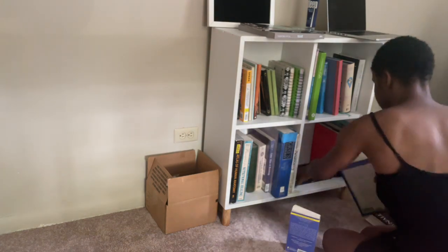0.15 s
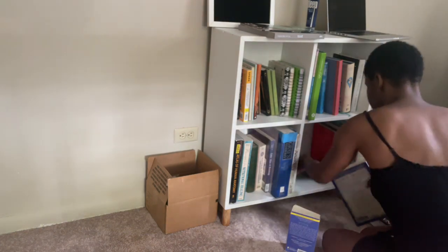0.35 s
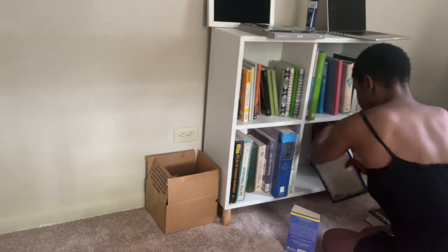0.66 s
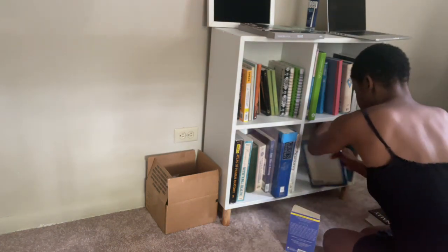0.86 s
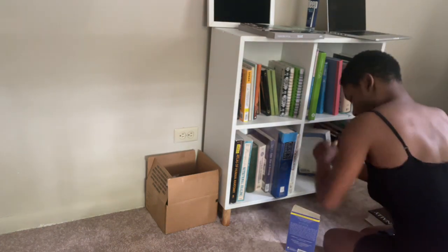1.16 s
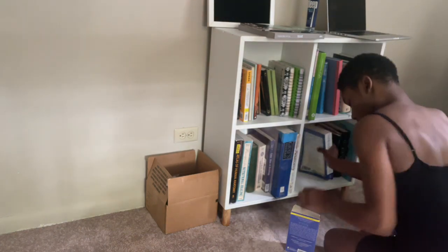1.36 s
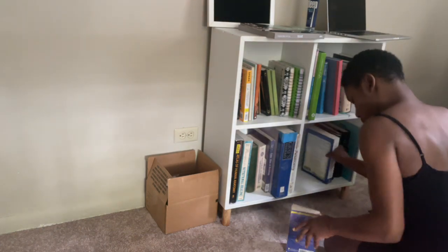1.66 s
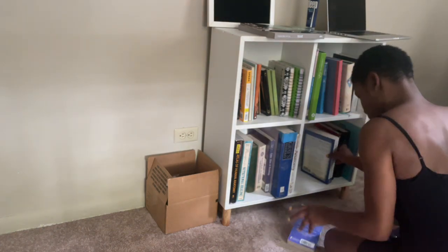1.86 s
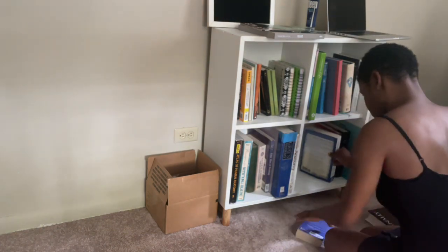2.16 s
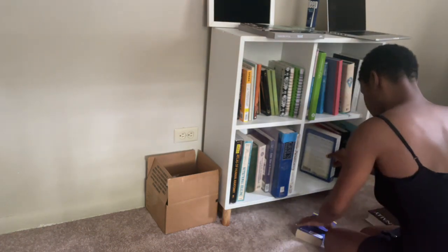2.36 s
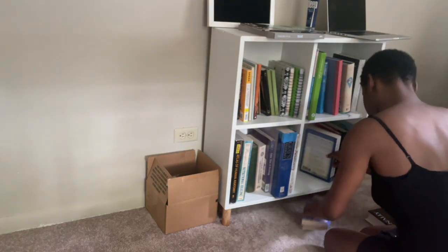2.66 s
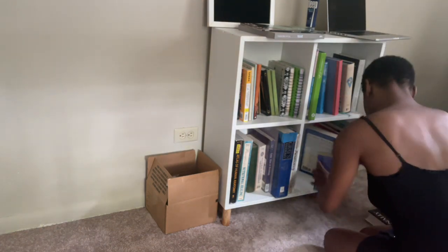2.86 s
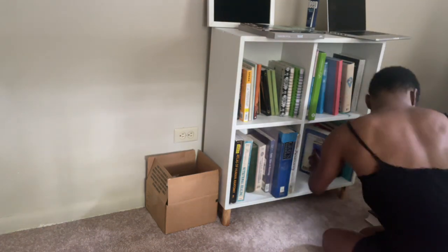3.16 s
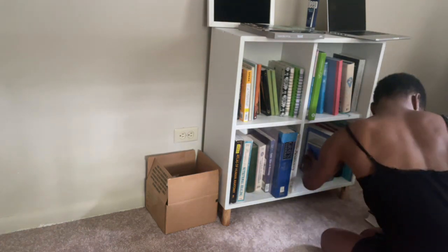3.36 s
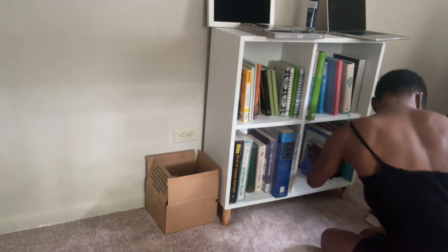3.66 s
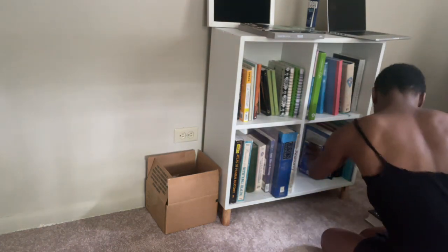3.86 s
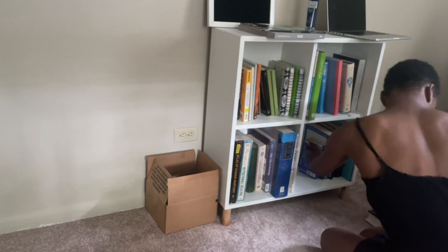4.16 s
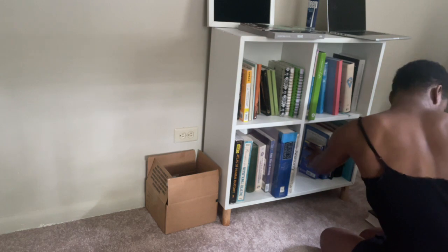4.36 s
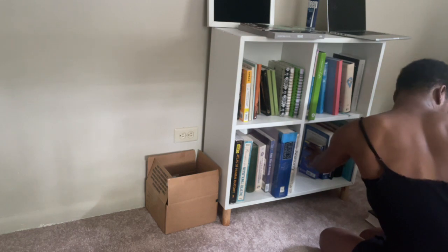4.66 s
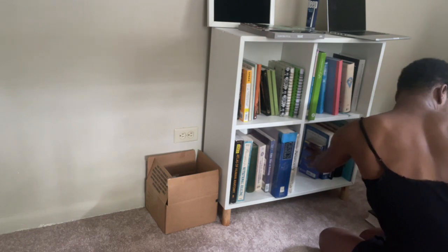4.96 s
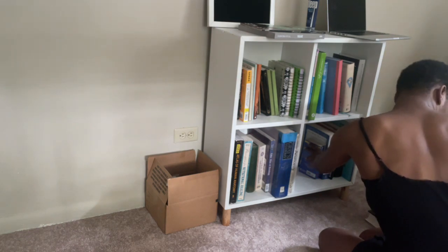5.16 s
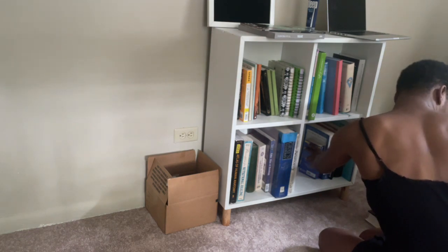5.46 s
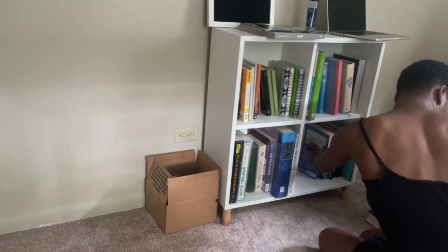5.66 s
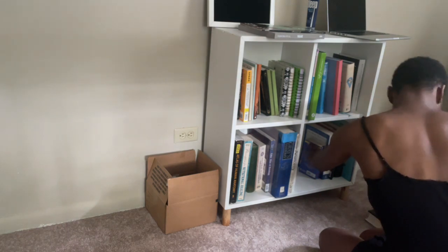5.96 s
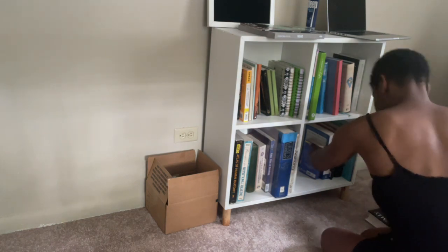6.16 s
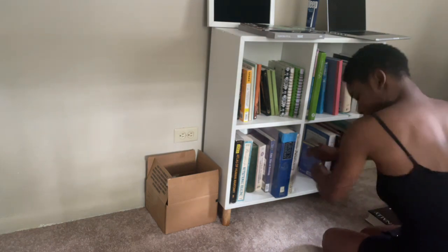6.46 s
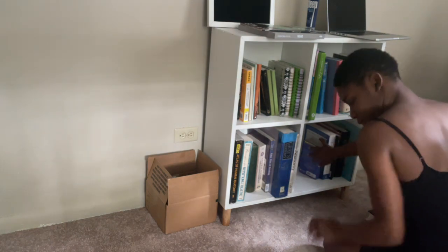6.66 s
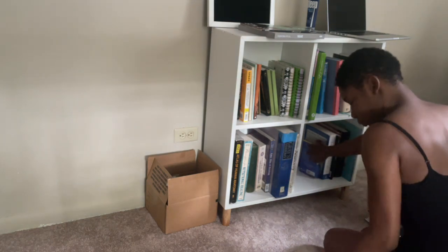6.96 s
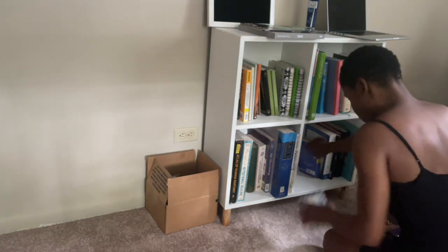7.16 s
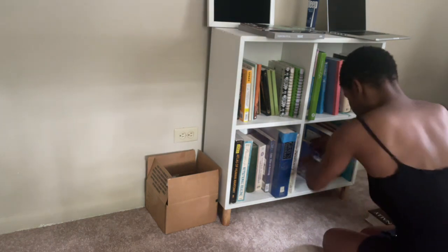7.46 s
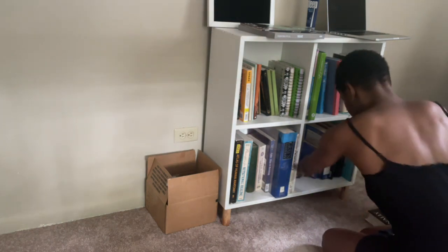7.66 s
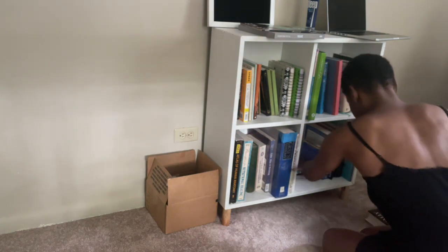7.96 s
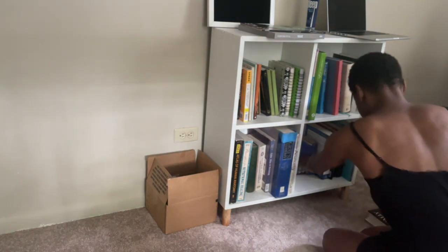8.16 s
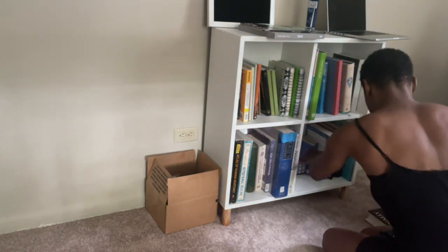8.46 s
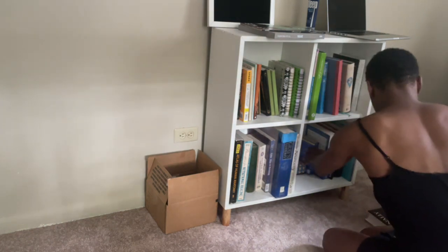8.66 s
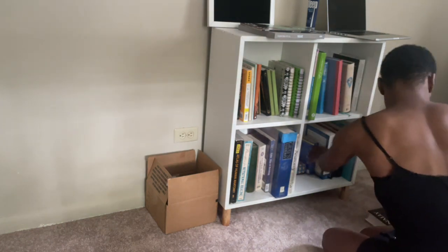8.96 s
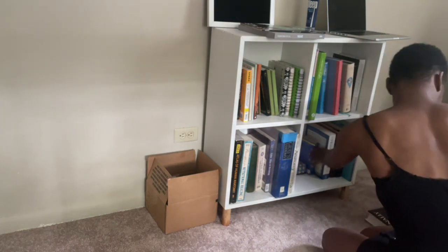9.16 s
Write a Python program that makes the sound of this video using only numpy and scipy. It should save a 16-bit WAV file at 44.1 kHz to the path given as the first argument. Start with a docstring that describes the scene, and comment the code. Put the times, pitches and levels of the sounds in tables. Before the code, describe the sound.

Irregular soft knocks, papery slides and a small frame click at a bookshelf over faint low hum, then a book topples with a sharp slap.

```python
"""At first a faint two-note hum holds steady; at 0.7 s it shifts in level, then slowly fades into quiet room air.
From the start a picture frame and books go into a cube bookshelf in a small carpeted room: noise bursts and
ringing modes make edges tap and thud, grainy filtered noise makes covers scuff, and the frame clicks near 1.7 s.
At 7.5 s one book topples with a loud slap, and a few last taps and scuffs follow.
Clothes shift faintly on the carpet throughout, as soft grainy noise."""
import sys
import numpy as np
from scipy import signal
from scipy.fft import rfft, irfft, next_fast_len
from scipy.io import wavfile
from scipy.ndimage import map_coordinates

SR = 44100
rng = np.random.default_rng(int(sys.argv[2]) if len(sys.argv) > 2 else 0)


def output_pcm(signal):
    """Save a mono or channel-first signal as 16-bit PCM at the path in sys.argv[1].

    Samples are clipped to [-1, 1] before scaling.
    """
    pcm = np.clip(np.atleast_2d(signal).T, -1, 1) * 32767
    wavfile.write(sys.argv[1], SR, np.round(pcm).astype(np.int16))


N = 411012  # length in samples

# Books meeting the shelf and each other; long contacts are dull, heavy ones rich in bass. Each row: start in
# seconds, base level in dB, weight in dB per octave of bass (exact in the deepest register), contact time in ms.
BOOK_CONTACTS = [(0.065, -57.5, -3, 0.067), (0.083, -57.5, -5, 0.046), (0.331, -55.5, -2, 0.75),
                 (0.361, -42.5, -7.5, 0.94), (0.731, -72.5, 5.5, 0.068), (0.861, -68.5, 4.5, 1.8),
                 (0.923, -44.5, -4, 1.75), (0.976, -64.5, 5.5, 0.72), (1.066, -72, 6.5, 0.34),
                 (1.267, -59.5, 3, 3.5), (1.622, -45, 0, 2.16), (1.659, -47, 1, 0.46),
                 (1.698, -65.5, 4.5, 0.093), (1.93, -58, 5.5, .8), (1.943, -66.5, 6.5, 1),
                 (3.457, -66.5, 6.5, 1.3), (3.485, -38, 0, 1.67), (3.499, -49, 3.5, .9),
                 (3.534, -56.5, -8, 0.15), (3.648, -62.5, 4, 0.66), (3.694, -57, 1.5, 1.84),
                 (3.721, -64, 4, 0.38), (4.411, -58, -6.5, 1.05), (4.477, -52.5, -13.5, 0.31),
                 (4.71, -66, -0.5, 0.74), (4.82, -65, -3.5, 2.1), (4.934, -50, -8, 1.27),
                 (4.946, -44.5, -13, 1.28), (5.034, -50, -6, 1.5), (6.262, -64.5, 1.5, 2.6),
                 (6.375, -72, 1, 2.1), (6.522, -74, -9, 1.3), (6.914, -61, -6, 0.73),
                 (7.492, -58, 0.5, 0.58), (7.508, -45, -10, 0.2), (7.533, -40.5, -21, 0.17),
                 (7.536, -22.5, -5, 0.14), (7.541, -20.5, -6.5, 3.8), (7.996, -58.5, -2, 0.33),
                 (8.008, -55.5, 2.5, 1.6), (8.044, -56, 1.5, 0.82), (8.124, -35.5, -1, 0.93),
                 (8.44, -75.5, -8.5, .8), (8.506, -73.5, 6, 0.51), (8.775, -71, -0.5, 1.6),
                 (8.925, -51, -0.5, 1.74), (8.987, -44, -2, 2.1)]
# Edges of a contact's registers (thump, board, knock, rap, clack, tick). Each entry: frequency in Hz.
REGISTER_EDGES_HZ = [70, 200, 420, 780, 1750, 5200, 15800]
# How readily the boards answer in each register. Each entry: relative level in dB.
BOARD_RESPONSE_DB = [1, 3.5, 0, -2, -4.5, -5.5]
# Ringing modes of the shelf. Each row: frequency in Hz, relative level in dB, t60 in seconds.
SHELF_MODES = [(139.9, -3.5, 0.31), (254.1, -5.5, 0.18), (326, -3.5, 0.23), (398.3, -9.5, .33),
               (508.3, -6.5, 0.086), (606.3, -4, 0.15), (698, -4.5, 0.097), (856, -4.5, 0.083),
               (984, -5.5, .18), (1075, -5.5, 0.24), (1175, -7, .25), (1448, -2.5, 0.34), (1544, -1, 0.1),
               (1970, -13, .22), (2450, -9, 0.23), (2688, -7, .16), (2860, -4.5, .2), (3010, -6.5, .2),
               (3580, -8, 0.4), (4780, -5.5, 0.15)]
# Colour of a contact. Each row: frequency in Hz, relative level in dB.
CONTACT_COLOUR = [(60, -8), (140, 1.5), (330, 5.5), (500, 5), (900, -2), (1500, -6.5), (2100, -7.5),
                  (2900, -7.5), (4600, -14.5), (5500, -18), (9500, -21), (12500, -34.5), (15500, -41)]
# Decay of the room. Each row: frequency in Hz, t60 in seconds.
ROOM_DECAY = [(100, 0.4), (350, 0.46), (1500, 0.47), (5000, .43), (9000, 0.46), (15000, 0.37)]

# Strokes of a sliding book; grip favours the rubbing edge over the paper. Each row: start in seconds,
# length in seconds, base level in dB, grip in dB, push (growth from start to end) in dB.
SLIDE_STROKES = [(0.064, 0.086, -64, 1, -6), (0.196, 0.16, -68, 7, 6), (0.31, 0.17, -67.5, -4, -9),
                 (0.502, 0.062, -66.5, -3, -2), (0.721, 0.13, -76, 1, -8), (0.856, .17, -71, -8, 5),
                 (1.056, .1, -70, -2.5, -4), (1.252, .18, -64, 1.5, 0), (1.514, 0.12, -67, -2, 19.5),
                 (1.663, 0.044, -57, -10, 2.5), (1.9, 0.3, -71, 4, 5), (3.154, 0.48, -73.5, 0.5, -8.5),
                 (3.313, 0.198, -58.5, -5.5, 9.5), (3.666, 0.094, -64.5, -1, 3),
                 (4.149, 0.66, -71.5, 2.5, 5), (4.51, 0.056, -61, 4, -1), (4.569, 0.19, -74, 8.5, 1),
                 (4.76, 0.34, -80.5, -5, 2), (4.918, 0.1, -76, 18.5, -1), (5.023, 0.087, -67.5, 2, -9),
                 (5.09, 0.21, -83.5, 6, -8), (5.817, .075, -76, 5.5, 2), (5.987, 0.057, -78, 5.5, -9),
                 (6.613, 0.092, -79, 1.5, -1), (6.775, .05, -83, 4, -3), (6.845, .15, -73.5, -4.5, -3.5),
                 (7.322, 0.2, -81.5, -7, 31), (7.986, 0.18, -63.5, -1.5, -6), (8.305, .14, -88.5, -20, 4),
                 (8.495, .06, -71.5, -6.5, 2), (8.935, .08, -61.5, -4.5, -4.5),
                 (9.145, 0.053, -84.5, 6, -1)]
# Colour of edges rubbing on the board. Each row: frequency in Hz, relative level in dB.
RUB_COLOUR = [(40, -46), (120, -19.5), (300, 7.5), (550, -7), (1000, -4.5), (1400, -3.5), (2000, -5),
              (3200, -29), (6000, -59)]
# Colour of cover on cover. Each row: frequency in Hz, relative level in dB.
SCUFF_COLOUR = [(500, -53), (1200, -29), (2300, 1), (3000, -1), (4100, 0), (5400, -2.5), (6300, -5),
                (8500, -26), (13000, -56.5)]
# Colour of hissing paper. Each row: frequency in Hz, relative level in dB.
PAPER_COLOUR = [(2000, -51), (4000, -28.5), (6300, -3.5), (7500, -1), (9300, -1), (11500, -5.5),
                (13000, -15), (15500, -26)]
# Sheen of a fast stroke. Each row: frequency in Hz, relative level in dB.
SWISH_COLOUR = [(2500, -34.5), (4000, -7.5), (5300, -0.5), (6300, -2.5), (8000, -18.5), (12000, -44.5)]

# Hard little contacts of a picture frame, fingernails and cover corners. Each row: start in seconds,
# frame ring level in dB, snap level in dB.
HARD_CLICKS = [(0.368, -73, -61.5), (1.66, -43.5, -65), (1.93, -72.5, -76.5), (1.944, -75, -70.5),
               (1.973, -74, -69), (2.249, -59, -67), (2.254, -76, -64.5), (2.778, -99, -82),
               (2.899, -100, -93), (5.933, -86, -83), (6.615, -89, -74.5), (6.636, -85, -72.5),
               (8.504, -89, -84)]
# Ringing of the frame, damped by the hand that holds it. Each row: frequency in Hz, relative level in dB,
# t60 in seconds.
FRAME_MODES = [(1240, -8, 0.021), (1740, -3, 0.018), (1960, 1.5, 0.023), (2110, 3.5, 0.034),
               (2270, 2.5, 0.024), (2560, -2, 0.02), (2970, 1.5, 0.011), (3520, -8, 0.018),
               (4200, 3, 0.0082), (5360, -7.5, 0.0113)]
# Colour of a snap. Each row: frequency in Hz, relative level in dB.
SNAP_COLOUR = [(500, -12), (1300, -11), (2300, 0), (4500, 3.5), (7000, -3), (10000, -4), (12500, -21),
               (15500, -21)]

# Colour of cloth on carpet. Each row: frequency in Hz, relative level in dB.
CARPET_COLOUR = [(30, -41.5), (100, -12), (220, 2.5), (400, -2.5), (800, -10.5), (1500, -21), (4000, -35.5),
                 (12000, -57.5)]
# Colour of the room's still air. Each row: frequency in Hz, relative level in dB.
AIR_COLOUR = [(20, -43), (31, -32.5), (40, -23), (60, 2.5), (100, 0), (145, 0.5), (210, -8), (320, -22),
              (500, -23.5), (1000, -28.5), (2000, -36), (4000, -40), (10000, -43), (13000, -52),
              (15500, -61.5)]

BASS_BELOW_HZ, BASS_BEND = 620, 1.4  # weight tells below this pitch, and most in the deepest register
CONTACT_Q = 0.91  # the cover springs on the board, favouring the pitch near 1 / contact time
CORNER_DB = -38.5  # a hard corner always adds a trace of treble
SLIDE_ATTACK_S, SLIDE_RELEASE_S = 0.025, 0.01  # a book gets moving, and comes to rest
SLIDE_ARCH_DB = 2  # a stroke is fastest in its middle
HISS_DB, HISS_LOSS = -4.5, 0.35  # paper against the scuff; dB of it lost per dB of grip
SWISH_EVEN_DB = -54  # scuff level at which the faster-growing swish equals it
LOAD_CHANGE_S, LOAD_GLIDE_S = 0.72, 0.23  # when the machinery changes its load, and how long the step takes


def knocks():
    """Every contact sounds anew; weight and contact time set its registers."""
    out = np.zeros(N + SR)
    for start, level_db, weight_db, contact_ms in BOOK_CONTACTS:
        hit = blow(register_levels(level_db, weight_db, contact_ms))
        out[round(start * SR):][:len(hit)] += hit
    return out[:N]


def register_levels(level_db, weight_db, contact_ms):
    """Weight tilts the bass; a contact cannot excite much above the inverse of its duration."""
    edges = np.array(REGISTER_EDGES_HZ)
    centre_hz = np.sqrt(edges[:-1] * edges[1:])
    cycles = centre_hz * contact_ms / 1000
    spring = 1 / np.hypot(1 - cycles ** 2, cycles / CONTACT_Q)
    treble_db = 20 * np.log10(np.hypot(spring, amp(CORNER_DB)))
    octaves = np.maximum(np.log2(BASS_BELOW_HZ / centre_hz), 0)
    bass = octaves[0] * (octaves / octaves[0]) ** BASS_BEND
    return level_db + np.array(BOARD_RESPONSE_DB) + weight_db * bass + treble_db


def blow(levels_db, crack_db=8, crack_t60=0.025, rattle_t60=0.21, room_db=-8, ring_db=-17,
         swell_cycles=0.34, shortest_swell_s=0.00059):
    """One contact: a crack, a short rattle of covers, the ringing shelf and the room, levelled by register."""
    t = np.arange(SR // 2) / SR
    crack, rattle = rng.standard_normal((2, len(t)))
    ring = np.zeros(len(t))
    for hz, db, t60 in SHELF_MODES:
        vary_db, phase = rng.standard_normal(2)  # no two contacts ring quite alike
        ring += amp(db + vary_db) * fade(t, t60) * np.sin(2 * np.pi * (hz * t + phase))
    hit = amp(crack_db) * fade(t, crack_t60) * crack
    hit += fade(t, rattle_t60) * rattle
    hit += amp(room_db) * room_tail()
    hit += amp(ring_db) * ring
    hit = coloured(hit, CONTACT_COLOUR)

    out = np.zeros(len(t))
    for db, lo, hi in zip(levels_db, REGISTER_EDGES_HZ, REGISTER_EDGES_HZ[1:]):
        # card gives a little on contact, and the boards need part of a cycle to swing up
        swell_s = max(shortest_swell_s, swell_cycles / np.sqrt(lo * hi))
        part = register(hit * (1 - np.exp(-t / swell_s)), lo, hi)
        out += amp(db) * part / np.std(part[:SR // 20])  # levelled on its first 50 ms
    return out


def register(x, lo, hi):
    """The part of x between two frequencies; the upper edge is steep, as soft card gives no treble."""
    above = signal.butter(3, lo, "high", fs=SR, output="sos")
    below = signal.butter(6, hi, fs=SR, output="sos")
    return signal.sosfilt(np.vstack([above, below]), x)


def slides(room_db=-1.5, uneven_db=1.5, sway_db=-0.57):
    """One stroke drives every friction: edges rub, covers scuff, paper hisses, and fast strokes swish."""
    power = np.zeros((3, N))
    for start, length, level_db, grip_db, push_db in SLIDE_STROKES:
        gains = amp(level_db + np.array([grip_db, 0, HISS_DB - HISS_LOSS * grip_db]))
        power += (gains[:, None] * stroke(start, length, push_db)) ** 2
    rub, scuff, hiss = np.sqrt(power)
    swish = scuff ** 2 / amp(SWISH_EVEN_DB)
    pressure = amp(uneven_db * wobble(70) + sway_db * wobble(16))
    dry = rub * friction(RUB_COLOUR, slips_hz=198, grain_db=-1.5)
    dry += scuff * friction(SCUFF_COLOUR, slips_hz=296, grain_db=-4)
    dry += hiss * friction(PAPER_COLOUR, slips_hz=302, grain_db=-4.5)
    dry += swish * friction(SWISH_COLOUR, slips_hz=300, grain_db=-8)
    return in_room(pressure * dry, room_db)


def stroke(start, length, push_db):
    """Gain of one stroke: it sets in, swells, grows or slackens, and stops."""
    t = np.arange(N) / SR - start
    attack = np.clip(t / SLIDE_ATTACK_S, 0, 1)
    release = np.clip(1 - (t - length) / SLIDE_RELEASE_S, 0, 1)
    done = np.clip(t / length, 0, 1)
    arch_db = SLIDE_ARCH_DB * (np.sin(np.pi * done) - 1)
    return attack * release * amp(push_db * (done - 0.5) + arch_db)


def friction(spectrum, slips_hz, grain_db):
    """Fibres catching and letting go: tiny random slips over a smooth hiss."""
    slips = (rng.random(N) < slips_hz / SR) * rng.standard_normal(N)
    return unit(coloured(rng.standard_normal(N) + amp(grain_db) * unit(slips), spectrum))


def clicks(snap_t60=0.015, room_db=-2):
    """A brief snap and the frame's short, dry ring, carried on by the room."""
    t = np.arange(SR // 2) / SR
    out = np.zeros(N + SR)
    for start, ring_db, snap_db in HARD_CLICKS:
        ring = np.zeros(len(t))
        for hz, db, t60 in FRAME_MODES:
            ring += amp(db) * fade(t, t60) * np.sin(2 * np.pi * (hz * t + rng.random()))
        snap = coloured(rng.standard_normal(len(t)) * fade(t, snap_t60), SNAP_COLOUR)
        hit = amp(ring_db) * ring / np.std(ring[:SR // 20])
        hit += amp(snap_db) * snap / np.std(snap[:SR // 20])
        out[round(start * SR):][:len(t)] += in_room(hit, room_db)
    return out[:N]


def shuffling(level_db=-78, uneven_db=0.5):
    """Knees and clothes shift faintly on the carpet all along: soft friction with a wavering level."""
    return amp(level_db + uneven_db * wobble(11)) * friction(CARPET_COLOUR, slips_hz=59, grain_db=-3.5)


def background(air_db=-66):
    """Two wavering hums of distant machinery over the room's still air."""
    upper_gain = hum_gain(level_db=-54, step_db=-5.5, fade_db_per_s=2.2)
    lower_gain = hum_gain(level_db=-68, step_db=7, fade_db_per_s=1.8)
    hum = upper_gain * tone(111.5, drift_hz=1.1, waver_db=2.0)
    hum += lower_gain * tone(72, drift_hz=2.1, waver_db=1.3)
    return hum + amp(air_db) * unit(coloured(rng.standard_normal(N), AIR_COLOUR))


def hum_gain(level_db, step_db, fade_db_per_s):
    """Steady until the machinery's change of load, then a step and a slow fade."""
    since = np.maximum(np.arange(N) / SR - LOAD_CHANGE_S, 0)
    return amp(level_db + step_db * np.minimum(since / LOAD_GLIDE_S, 1) - fade_db_per_s * since)


def tone(hz, drift_hz, waver_db):
    """A slightly unsteady sine of rms 1: its pitch drifts and its level wavers."""
    phase = 2 * np.pi * np.cumsum(hz + drift_hz * wobble(5.2)) / SR
    return unit(np.sin(phase) * amp(waver_db * wobble(7.6)))


def in_room(x, room_db, early_db=10, early_t60=0.1):
    """Shares power between the direct path and reflections, most of them early, from the cubby's walls."""
    tail = room_tail()
    t = np.arange(len(tail)) / SR
    tail = tail * (1 + amp(early_db) * fade(t, early_t60))
    wet = signal.fftconvolve(x, tail / np.linalg.norm(tail))[:len(x)]
    return (x + amp(room_db) * wet) / np.hypot(1, amp(room_db))


def room_tail():
    """Half a second of dense reflections as noise; each frequency dies at its own speed."""
    hz, t, z = signal.stft(rng.standard_normal(SR), SR, nperseg=256)
    decay = amp(-60 * t / along(ROOM_DECAY, hz)[:, None])
    return signal.istft(z * decay, SR, nperseg=256)[1][:SR // 2]


def coloured(x, spectrum):
    """x through a causal minimum-phase filter with the given (Hz, dB) shape."""
    size = 2 * next_fast_len(len(x))
    cepstrum = irfft(np.log(amp(along(spectrum, np.fft.rfftfreq(size, 1 / SR)))))
    # folding the cepstrum forward puts the filter's energy right at the onset
    cepstrum[1:size // 2] *= 2
    cepstrum[size // 2 + 1:] = 0
    return irfft(rfft(x, size) * np.exp(rfft(cepstrum)))[:len(x)]


def along(points, hz):
    """(Hz, value) points read on a log frequency axis."""
    f, v = np.transpose(points)
    return np.interp(np.log(hz + 1), np.log(f + 1), v)


def wobble(rate):
    """A smooth random curve, rate knots a second."""
    knots = rng.standard_normal(int(N * rate / SR) + 4)
    return map_coordinates(knots, [np.arange(N) * rate / SR])


def fade(t, t60):
    """Exponential decay that falls 60 dB in t60 seconds."""
    return 10 ** (-3 * t / t60)


def amp(db):
    """Decibels to gain."""
    return 10 ** (np.asarray(db) / 20)


def unit(x):
    """Scaled to rms 1."""
    return x / np.sqrt(np.mean(x ** 2) + 1e-20)


def scene():
    """Knocks, clicks and slides over carpet shuffling and the room's background, in one channel."""
    return (knocks() + clicks() + slides() + shuffling() + background())[None]


def record(dry):
    """A very steep low-pass: almost nothing passes above 15.8 kHz."""
    size = next_fast_len(N + SR)
    hz = np.fft.rfftfreq(size, 1 / SR)
    return irfft(rfft(dry, size) / (1 + (hz / 15800) ** 160), size)[:, :N]


dry = scene()
out = record(dry)
output_pcm(out)
```